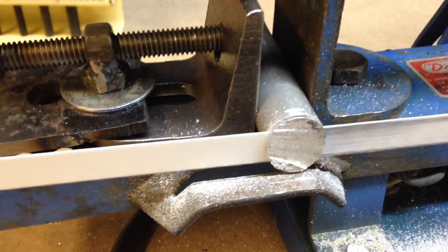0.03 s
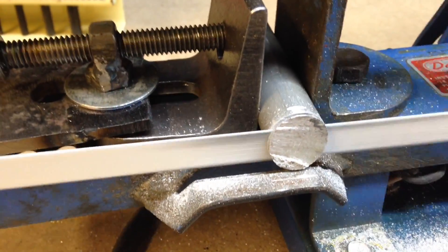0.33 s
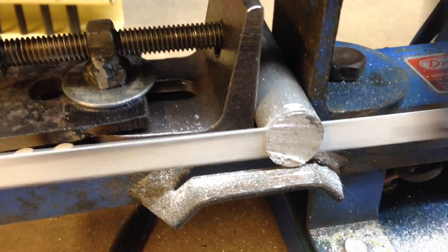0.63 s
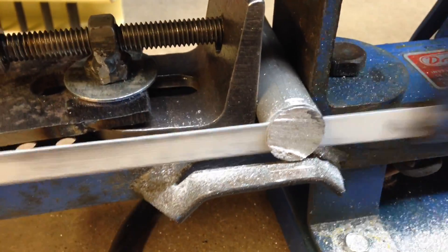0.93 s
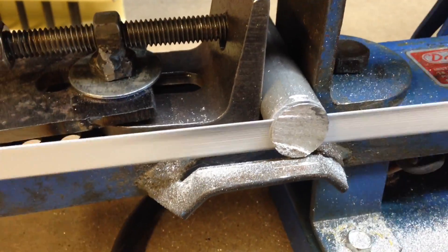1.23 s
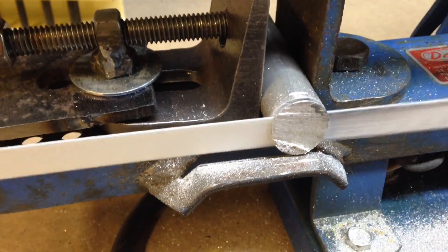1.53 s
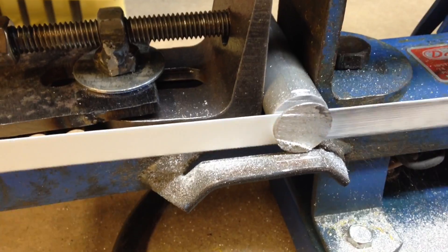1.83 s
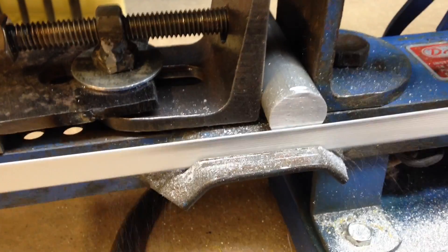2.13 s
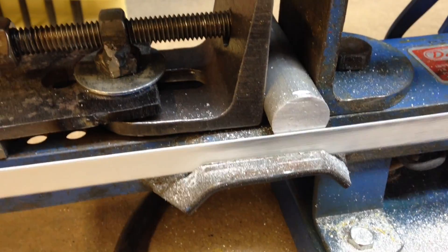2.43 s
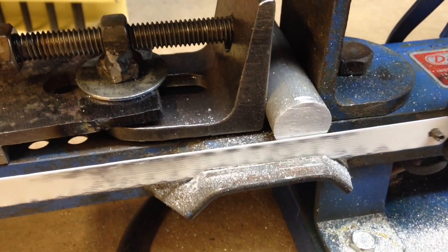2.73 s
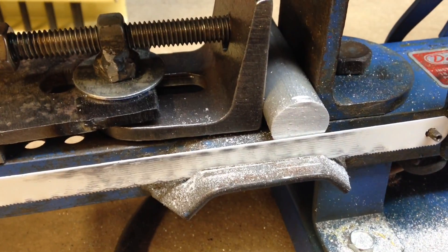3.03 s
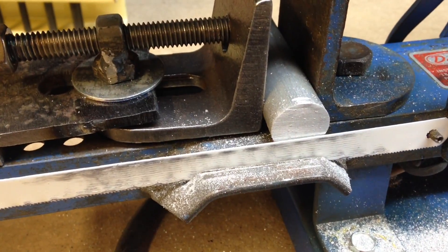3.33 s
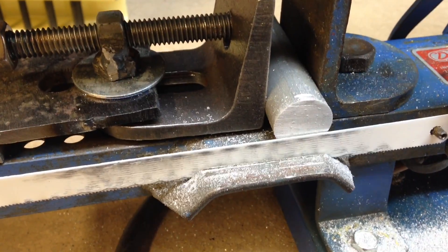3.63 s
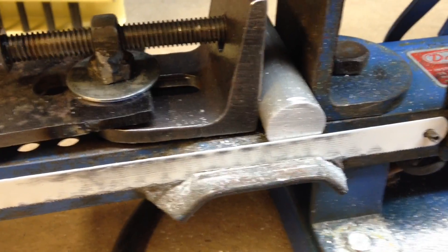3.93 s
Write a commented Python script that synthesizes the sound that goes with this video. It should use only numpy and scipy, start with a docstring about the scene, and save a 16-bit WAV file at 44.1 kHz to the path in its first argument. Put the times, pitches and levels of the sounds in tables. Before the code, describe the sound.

A power hacksaw rasps through a metal bar, the offcut clatters and the machine stops.

```python
"""A blade rasps to and fro through a metal bar: a power hacksaw in a workshop, its teeth tearing chips,
its drive gear rattling and its frame rumbling. The blade breaks through, the bow drops and the offcut
clatters down. The motor cuts out, the gear clacks ever slower and the bow stops with a knock,
leaving a faint ring over the hum of the room."""
import sys
import numpy as np
from scipy import signal
from scipy.fft import rfft, irfft
from scipy.io import wavfile
from scipy.ndimage import uniform_filter1d

SR = 44100
rng = np.random.default_rng(int(sys.argv[2]) if len(sys.argv) > 2 else 0)


def inscribe(sig):
    """Save sig as 16-bit PCM at rate SR to the path in sys.argv[1].

    A 1-D sig is mono; a 2-D sig holds one channel per row.
    Samples are clipped to [-1, 1] before scaling.
    """
    pcm = np.round(np.clip(np.atleast_2d(sig).T, -1, 1) * 32767)
    wavfile.write(sys.argv[1], SR, pcm.astype(np.int16))


N = 176400
T = np.arange(N) / SR
THROUGH_S, STOP_S = 2, 2.644   # the blade leaves the bar; the machine stands still

# EQ of the rasp: (frequency [Hz], level [dB])
RASP_EQ = [(200, -5), (800, 3), (1300, 1.5), (1850, 3.5), (2400, 0), (3200, -2.5), (4200, -2.5), (6500, -1),
           (7500, -1), (9200, -8), (10800, -3.5), (13500, -2), (15500, -10.5)]


def blade(level_db=-24, swing_db=1, release_s=0.14):
    """Teeth tear chips from the bar: a rasp that swells with each pass and fades once it is through."""
    contact = np.exp(-np.maximum(T - THROUGH_S, 0) / release_s) * run_down()
    rasp = colour(chips(), RASP_EQ) * stroke(swing_db)
    flicker = from_db(0.91 * drift(37))
    return from_db(level_db) * steel(rasp * flicker * contact)


# Passes of the blade, alternately out and back: (turn time [s], bite [dB], level change at the turn [dB])
BLADE_PASSES = [(0, -.5, 0.5), (0.181, 1.5, -3), (.368, 1.14, -3), (0.533, 3, -7), (0.709, 1.3, -3),
                (0.887, 1, -4), (1.085, 1, -2.5), (1.258, 2.1, -5.5), (1.435, 2, -7), (1.619, 1.5, -6),
                (1.797, 2, -3.5), (1.975, -.5, -1)]


def stroke(swing_db=0, turn_s=0.03):
    """Sawing envelope: follows the speed and bite of each pass and dips as the teeth let go to turn."""
    starts, bite_db, dip_db = np.transpose(BLADE_PASSES)
    passes = np.interp(T, starts, np.arange(len(starts)))
    bite = uniform_filter1d(bite_db[passes.astype(int)], size=900)
    swell = -swing_db * np.cos(2 * np.pi * passes)
    dips = sum(db * np.exp(-np.minimum(((T - s) / turn_s) ** 2, 20)) for s, db in zip(starts, dip_db))
    return from_db((bite + swell) * (T < THROUGH_S) + dips)


# Resonances of the blade and bow: (frequency [Hz], bandwidth [Hz], level [dB])
STEEL_MODES = [(3080, 54, -1), (3593, 190, 1), (3650, 79, -2), (3850, 63, -8.5), (4290, 140, -4.5),
               (4916, 80, 1.5), (5650, 28, -1), (5840, 130, -2.5), (6130, 130, -5.5), (7400, 110, -9),
               (9670, 140, -4.5)]


def steel(contact, ring_db=4):
    """Contact noise, heard directly and through the ringing steel."""
    return unit(contact + from_db(ring_db) * sum(resonate(contact, [mode]) for mode in STEEL_MODES))


# EQ of the grit in a gear clack: (frequency [Hz], level [dB])
GEAR_EQ = [(200, -18), (900, 3), (1500, -4.5), (2500, -7.5), (3200, -4.5), (4000, 1.5), (6300, 2.5),
           (9200, -2.5), (11000, 0.5), (15500, -7)]


def gear(level_db=-23.5, spread_db=6, rise_s=0.00089, decay_s=0.0023, jitter_s=0.00021):
    """Each meshing tooth gives a short gritty clack that builds up as the tooth skids."""
    meshes = np.flatnonzero(np.diff(np.floor(gear_phase())))
    timing, force = rng.standard_normal((len(meshes), 2)).T
    offsets = ((timing * jitter_s - 2 * rise_s) * SR).astype(int)
    hits = np.zeros(N)
    hits[np.clip(meshes + offsets, 0, N - 1)] = from_db(spread_db * np.tanh(force))
    poles = np.exp(-1 / (SR * np.array([rise_s, decay_s])))
    clacks = signal.lfilter([1], np.poly(poles), hits + 1e-18) * noise(GEAR_EQ)
    return from_db(level_db) * steel(clacks * stroke(swing_db=0.6) * run_down(coast_db=-2.5))


def gear_phase(mesh_hz=125, last_mesh_hz=39.5, slowing_hz_per_s=140):
    """Gear position in teeth: a steady rate under power, then slowing evenly to the stop."""
    rate_hz = np.clip(last_mesh_hz + slowing_hz_per_s * (STOP_S - T), 0, mesh_hz)
    teeth = np.cumsum(rate_hz) / SR
    return teeth - teeth[int(STOP_S * SR)]


def run_down(coast_db=0, unload_s=0.87, unloaded_s=2.2):
    """Envelope that ramps to coast_db as the drive loses its load, then dies quickly at the stop."""
    eased = np.clip((T - unload_s) / (unloaded_s - unload_s), 0, 1)
    return from_db(coast_db * eased) * np.exp(-np.clip((T - STOP_S) / 0.038, 0, 20))


# EQ of the bow's scrape: (frequency [Hz], level [dB])
SCRAPE_EQ = [(200, -15.5), (1200, -2.5), (2500, -5), (3200, -5.5), (3600, 3.5), (4250, 7), (4700, -3),
             (5500, -3.5), (5900, 1), (6400, -5), (9000, -5), (15500, -18.5)]
# Fader ride of the scrape, sinking at the last reversal: (time [s], level [dB])
SCRAPE_RIDE = [(2.05, 0), (2.29, 2.5), (2.36, -3), (2.415, -4), (2.48, 0), (2.56, 0), (2.64, -2)]


def bow_scrape(level_db=-28.5):
    """The bow scrapes and chatters unevenly on its guide until it stops."""
    level = from_db(level_db + np.interp(T, *np.transpose(SCRAPE_RIDE)) + 2.5 * drift(70))
    return level * colour(chips(), SCRAPE_EQ) * run_down()


# Resonances of the frame and bed: (frequency [Hz], bandwidth [Hz], level [dB])
FRAME_MODES = [(98.4, 62, -6.5), (129.6, 11, 7), (172, 10, 0), (237.7, 24, -0.5), (305, 25, -1),
               (354, 14, 2), (380, 26, 0), (574, 110, -10), (660, 44, -6), (1010, 160, -12),
               (1360, 220, -14.5)]
# Fader ride of the rumble: (time [s], level [dB])
RUMBLE_RIDE = [(0, 0), (.17, -2), (.25, -0.5), (2.03, -1), (2.08, -8.5), (2.16, -1.5), (2.22, -7),
               (2.31, -1.5), (2.38, -18.5), (2.53, -9), (2.66, -11), (2.8, -25.5), (2.95, -64)]


def frame_rumble(level_db=-20.5, lumps_db=2.5):
    """The uneven load of the cut shakes the frame and bed into a lumpy rumble."""
    ride = from_db(np.interp(T, *np.transpose(RUMBLE_RIDE))) * (T < RUMBLE_RIDE[-1][0])
    lumps = from_db(lumps_db * np.tanh(drift(12)))
    shake = resonate(chips() * stroke() * ride * lumps, FRAME_MODES)
    radiated = pass_band(shake, "high", hz=55, order=1)   # the rumble keeps out of the deep bass
    return from_db(level_db) * unit(radiated)


# Knocks of the bow and a few louder clacks of the slowing gear:
# (time [s], crack [dB], clang [dB], thud [dB], noise decay [s], clang focus [Hz])
MACHINE_HITS = [(2.0505, -2.5, -15.5, -21.5, 0.0032, 1950), (2.067, -20.5, -36.5, -41, 0.037, 1200),
                (2.1744, -24, -30.5, -27, .008, 2200), (2.3637, -32, -20.5, -36, .005, 1890),
                (2.41, -24, -41.5, -36.5, .004, 4000), (2.4287, -20.5, -41, -39, .004, 4006),
                (2.4385, -22, -40, -36, .004, 4000), (2.451, -31.5, -27, -37, 0.00494, 2000),
                (2.6453, -9.5, -11.5, -21.5, .0051, 3200), (2.7333, -24, -54, -30, 0.0055, 4000),
                (2.795, -33.5, -54, -46, 0.0071, 4010)]
# The offcut lands and bounces: same columns as MACHINE_HITS
OFFCUT_HITS = [(2.129, -10.5, -10, -14, .004, 1283), (2.2035, -12.5, -19.5, -29, .006, 698)]
# Ring of the bow: (frequency [Hz], level [dB], t60 [s])
BOW_MODES = [(400, 1, 0.049), (680, -6, .05), (1230, -0.5, 0.055), (1600, 0.5, 0.025), (1914, -4, 0.0296),
             (2130, -7.5, 0.028), (2940, 1, 0.041), (3270, 0, 0.018), (3720, 1.5, .012), (4100, -5.5, .02),
             (4700, -7.5, .025), (5750, -8.5, .025)]
# Ring of the offcut: (frequency [Hz], level [dB], t60 [s])
OFFCUT_MODES = [(626, -0.5, 0.046), (1074, -2, 0.05), (1168, -6.5, 0.086), (1437, -8, 0.044),
                (1700, -8, 0.043), (1940, -10.5, 0.043), (2360, -4.5, 0.033), (2804, 6, .04),
                (3677, 0.5, 0.035), (5310, -8.5, .04), (5650, -8.5, .04)]
# EQ of a hit's attack: (frequency [Hz], level [dB])
CRACK_EQ = [(300, -9), (1500, -1.5), (3000, -1), (5000, 0.5), (8000, -3), (12000, -3.5), (15500, -8.5)]


def knocks():
    """Bow, gear and offcut strike metal on metal: a bright crack, a thud in the frame and a clang."""
    crack_env = thud_env = 0
    for s, crack_db, _, thud_db, decay_s, _ in MACHINE_HITS + OFFCUT_HITS:
        blow = burst(s, decay_s)
        crack_env += from_db(crack_db) * blow
        thud_env += from_db(thud_db) * blow
    dull = pass_band(rng.standard_normal(N), "low", hz=316, order=2)   # a thud moves the low modes
    thud = resonate(thud_env * dull, FRAME_MODES) / np.std(resonate(dull, FRAME_MODES))
    crack = crack_env * noise(CRACK_EQ)
    return crack + thud + clang(MACHINE_HITS, BOW_MODES) + clang(OFFCUT_HITS, OFFCUT_MODES)


def clang(hits, modes, focus_octaves=0.45, off_focus_db=-6):
    """Each blow rings all modes; the point of contact favours those near its focus."""
    starts, _, hit_db, _, _, focus_hz = np.transpose(hits)
    out = np.zeros(N)
    for k, (hz, mode_db, t60) in enumerate(modes):
        off_focus = 1 - np.exp(-.5 * (np.log2(hz / focus_hz) / focus_octaves) ** 2)
        onsets = ((starts + rng.uniform(0, .002, len(starts))) * SR).astype(int)
        clicks = np.zeros(N)
        clicks[onsets] = from_db(hit_db + mode_db + off_focus_db * off_focus)
        r, w = np.exp(-np.log(1000) / (t60 * SR)), 2 * np.pi * hz / SR
        out += (-1) ** k * signal.lfilter([0, np.sin(w)], [1, -2 * r * np.cos(w), r * r], clicks + 1e-18)
    return out


# Long low tail of the machine: (frequency [Hz], level [dB], t60 [s])
TAIL_MODES = [(129.5, -28.5, 0.54), (160.6, -38, 1), (289, -39.5, 0.5), (390.7, -29.5, 0.31)]


def machine_ring():
    """The knock at the stop leaves the machine ringing with a wavering level."""
    return sum(from_db(db + 4.1 * drift(25.04)) * ring(STOP_S, hz, t60) for hz, db, t60 in TAIL_MODES)


# Resonances of the offcut's rattle: (frequency [Hz], bandwidth [Hz], level [dB])
RATTLE_MODES = [(620, 110, 1.5), (1150, 170, -4), (1600, 400, -10.5)]


def offcut_rattle(level_db=-28.5, peak_s=2.2, width_s=0.09):
    """The offcut rattles briefly along the bed."""
    swell = np.exp(-.5 * np.minimum(((T - peak_s) / width_s) ** 2, 40))
    return from_db(level_db + 3 * drift(50)) * unit(resonate(chips(), RATTLE_MODES)) * swell


# Squawks of the blade and bow, and one short tone of the frame at 0.24 s: (peak time [s], level [dB], width
# [s], pitch [Hz])
SQUAWKS = [(0.241, -11.5, 0.01, 377.7), (0.253, -21.5, 0.013, 571), (0.321, -21.5, 0.0041, 592),
           (0.681, -14.5, 0.0049, 620), (1.043, -10.5, 0.0074, 630), (1.765, -20.5, 0.0079, 588),
           (1.921, -7.5, 0.0083, 630), (2.203, -23.5, 0.049, 174.6)]


def judders(wander_hz=58.57, sag_per_s=5.8, octave_db=-12.5):
    """Brief rough squawks, sagging in pitch, when the blade grabs or the bow bounces, and one short low tone of
    the frame."""
    out, wander = 0, wander_hz * drift(110)
    for s, db, width_s, hz in SQUAWKS:
        phase = 2 * np.pi * np.cumsum(hz * (1 - sag_per_s * (T - s)) + wander) / SR
        tone = np.sin(phase) + from_db(octave_db) * np.sin(2 * phase)
        out += from_db(db) * np.exp(-.5 * ((T - s) / width_s) ** 2) * tone
    roughness = from_db(2.6 * np.tanh(drift(190)))
    return out * roughness


def stand_drone(drone_db=-28, whine_db=-29.5):
    """The stand drones at the gear's mesh rate and, under load, whines at the third harmonic."""
    phase = 2 * np.pi * gear_phase()
    drone = from_db(drone_db + 2.2 * drift(9.7)) * np.sin(phase + 0.27 * drift(22))
    whine = from_db(whine_db + 2 * drift(14)) * np.sin(3 * phase + 0.76 * drift(7.2))
    load = np.exp(-np.maximum(T - THROUGH_S, 0) / 0.15) * stroke()
    return drone * run_down(coast_db=-34) + whine * load


def stand_thumps(hz=65.5, turn_db=-30.5, return_db=-7, heavy_db=-20.5):
    """The stand thumps after each reversal, every second one softer, and once heavily late in the cut."""
    turns = sum(from_db(turn_db + return_db * (k % 2)) * ring(s + 0.03, hz, t60=0.28)
                for k, (s, _, _) in enumerate(BLADE_PASSES[:-1]))
    return turns + from_db(heavy_db) * ring(start_s=1.8, hz=hz, t60=0.075)


# Buzzes after the stop: (time [s], level [dB], decay [s])
BUZZ_CUES = [(2.868, -55, 0.075), (2.962, -62, 0.21)]
# Resonances of the loose parts: (frequency [Hz], bandwidth [Hz], level [dB])
LOOSE_MODES = [(833, 33, 7), (1080, 290, -11), (1320, 31, -1), (1800, 260, -15)]


def loose_parts():
    """Loose parts give a faint, rough, dying buzz as the machine settles."""
    level = sum(from_db(db) * burst(s, decay_s) for s, db, decay_s in BUZZ_CUES)
    return level * unit(resonate(chips(), LOOSE_MODES))


def workshop_reverb(x, wet_db=-9, split_hz=1100, low_t60_s=0.57, high_t60_s=0.27):
    """Diffuse reflections in which the lows last longer."""
    white = rng.standard_normal(N)
    low = pass_band(white, "low", split_hz, order=3) * from_db(-60 * T / low_t60_s)
    high = pass_band(white, "high", split_hz, order=3) * from_db(-60 * T / high_t60_s)
    tail = (low + high) * (T > .004)   # pre-delay
    return from_db(wet_db) * signal.fftconvolve(x, tail / np.linalg.norm(tail))[:N]


# Tones of the room's hum: (frequency [Hz], level [dB])
HUM_TONES = [(59.2, -58), (107.7, -62.5), (113, -67), (236.9, -65.5), (263.8, -73), (409.1, -76.5),
             (586.8, -87)]
# EQ of the room's noise bed: (frequency [Hz], level [dB])
ROOM_EQ = [(25, -14.5), (40, -17), (60, -11.5), (85, -17.5), (115, -9.5), (160, -22), (250, -16.5),
           (340, -29), (600, -29.5), (1000, -35), (2500, -43.5), (4200, -40), (5500, -43.5), (6700, -43.5),
           (8000, -48), (9600, -46), (15000, -52.5)]


def room_tone(noise_db=-61):
    """A wavering hum over a faint bed of noise."""
    hum = sum(from_db(db + 1.5 * drift(4)) * np.sqrt(2) * np.sin(2 * np.pi * hz * T + .7 * drift(3.7))
              for hz, db in HUM_TONES)
    return hum + from_db(noise_db) * noise(ROOM_EQ)


def chips(per_s=5000, spread_db=3):
    """Dense uneven clicks: the grain of tearing, scraping and rattling metal."""
    size = from_db(spread_db * np.minimum(rng.exponential(1, N), 5)) * rng.choice([-1, 1], N)
    return size * (rng.random(N) < per_s / SR)


def from_db(db):
    """Decibels to gain."""
    return 10 ** (np.asarray(db) / 20)


def unit(x):
    """Scale to rms 1 over the first half, while the saw cuts."""
    return x / np.sqrt(np.mean(x[:N // 2] ** 2) + 1e-20)


def drift(rate_hz):
    """Random wander of spread 1, mostly slower than rate_hz."""
    f = np.arange(N // 2 + 1) * SR / N
    return unit(irfft(rfft(rng.standard_normal(N)) / (1 + (f / rate_hz) ** 2), N))


def colour(x, eq):
    """Apply an EQ curve, rolled off below its first point, and normalise."""
    hz, db = np.transpose(eq)
    f = np.maximum(np.arange(N // 2 + 1) * SR / N, 1)
    gain = from_db(np.interp(np.log(f), np.log(hz), db)) / np.hypot(1, (hz[0] / f) ** 2)
    return unit(irfft(rfft(x) * gain, N))


def noise(eq):
    """Steady coloured noise of rms 1."""
    return colour(rng.standard_normal(N), eq)


def pass_band(x, kind, hz, order):
    """Low-pass or high-pass filter."""
    return signal.sosfilt(signal.butter(order, hz, kind, fs=SR, output="sos"), x)


def resonate(x, modes):
    """Parallel resonances of alternating sign."""
    out = np.zeros(N)
    for k, (hz, width, db) in enumerate(modes):
        r = np.exp(-np.pi * width / SR)
        band = signal.lfilter([1, 0, -1], [1, -2 * r * np.cos(2 * np.pi * hz / SR), r * r], x + 1e-18)
        out += (-1) ** k * from_db(db) * (1 - r * r) / 2 * band
    return out


def ring(start_s, hz, t60):
    """One struck mode."""
    age = np.maximum(T - start_s, 0)
    return np.sin(2 * np.pi * hz * age) * from_db(-60 * np.minimum(age / t60, 2))


def burst(start_s, decay_s):
    """Instant attack and exponential decay."""
    return (T >= start_s) * np.exp(-np.minimum(np.abs(T - start_s) / decay_s, 20))


def scene():
    """The saw, close by, in mono: its main layers feed the reverb and the rest stay dry."""
    saw = blade() + gear() + bow_scrape() + frame_rumble() + knocks() + machine_ring() + offcut_rattle()
    reverb = workshop_reverb(saw)
    dry_layers = judders() + stand_drone() + stand_thumps() + loose_parts()
    return (saw + reverb + dry_layers + room_tone())[None]


def record(dry, ceiling=1.2, cutoff_hz=15400):
    """Soft clipping rounds the peaks and a steep low-pass cuts the top."""
    rounded = ceiling * np.tanh(dry / ceiling)
    return signal.sosfilt(signal.ellip(12, .1, 80, cutoff_hz, fs=SR, output="sos"), rounded)


dry = scene()
out = record(dry)
inscribe(out)
```